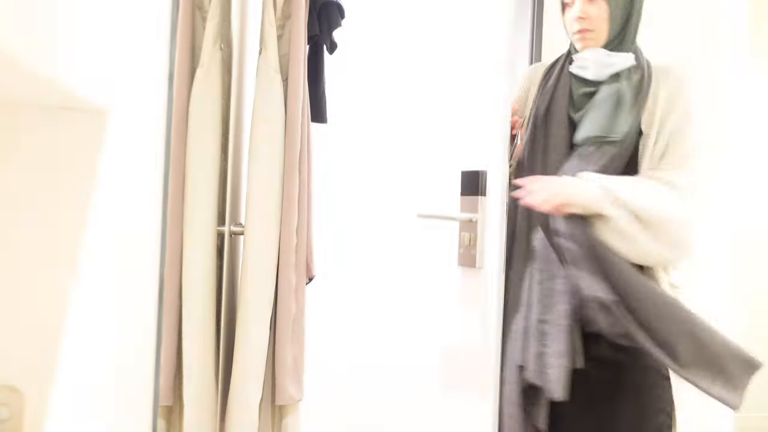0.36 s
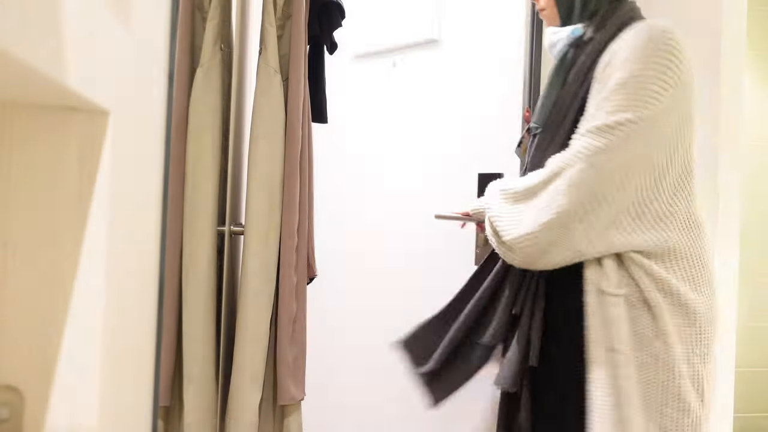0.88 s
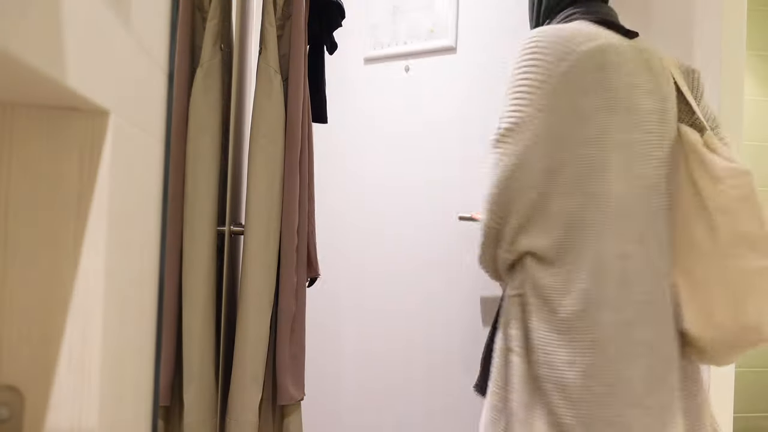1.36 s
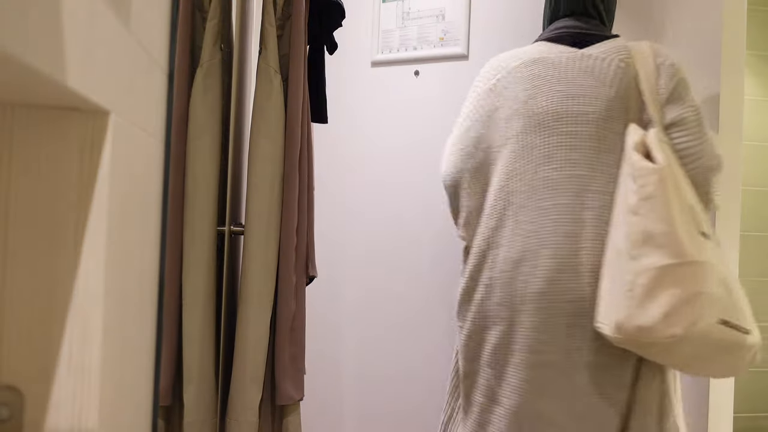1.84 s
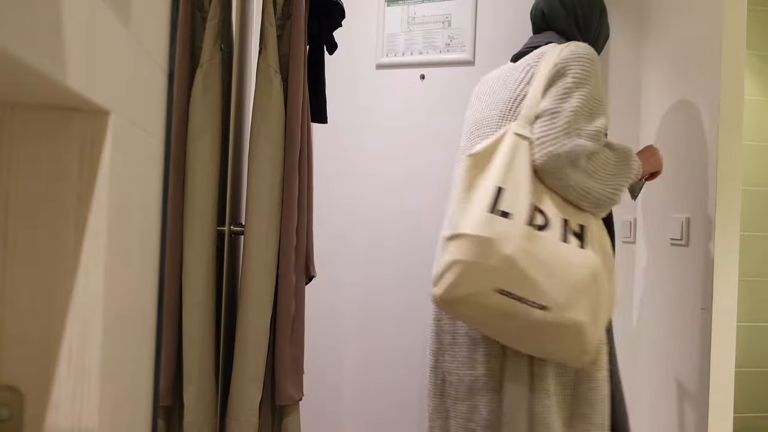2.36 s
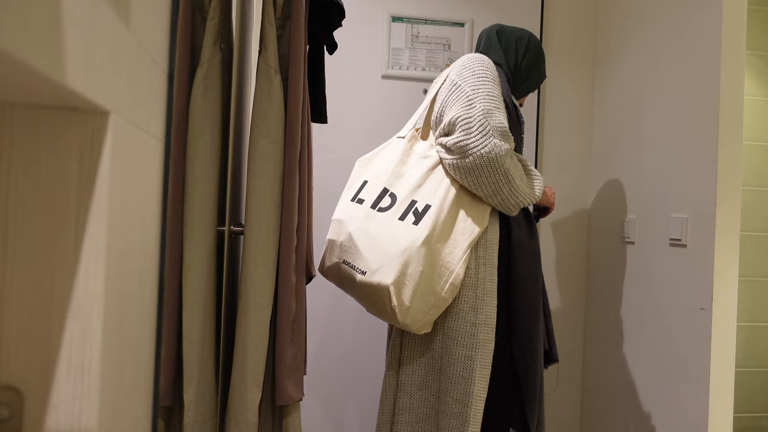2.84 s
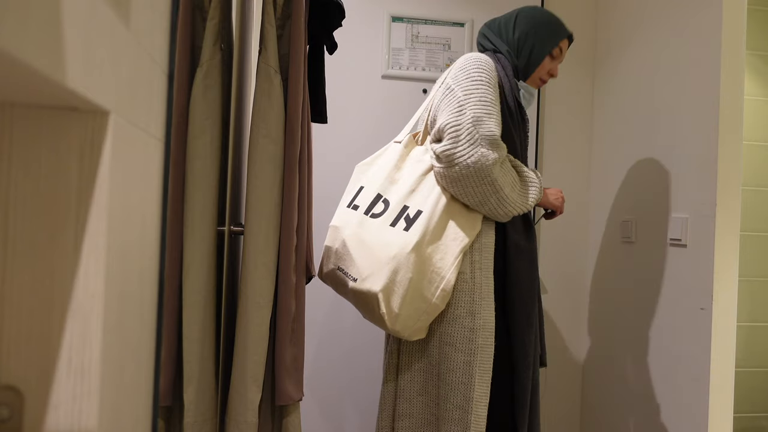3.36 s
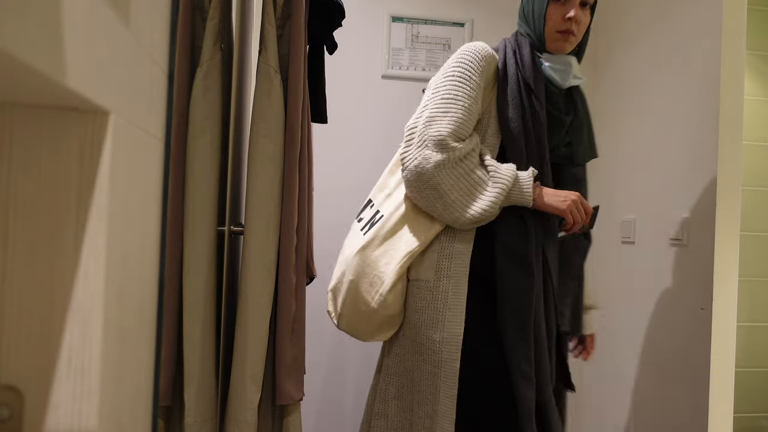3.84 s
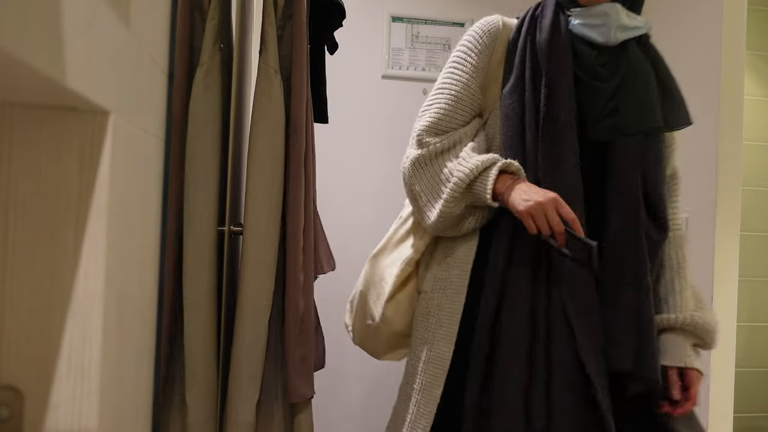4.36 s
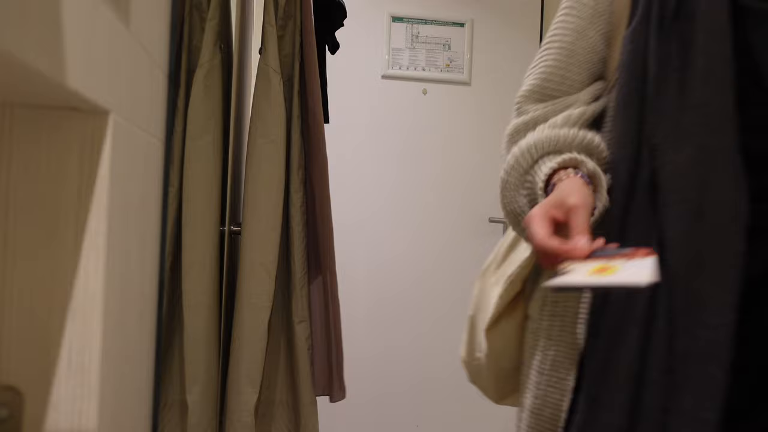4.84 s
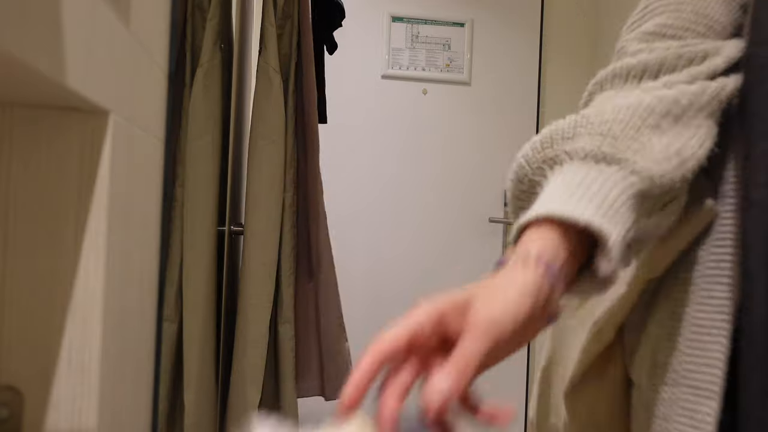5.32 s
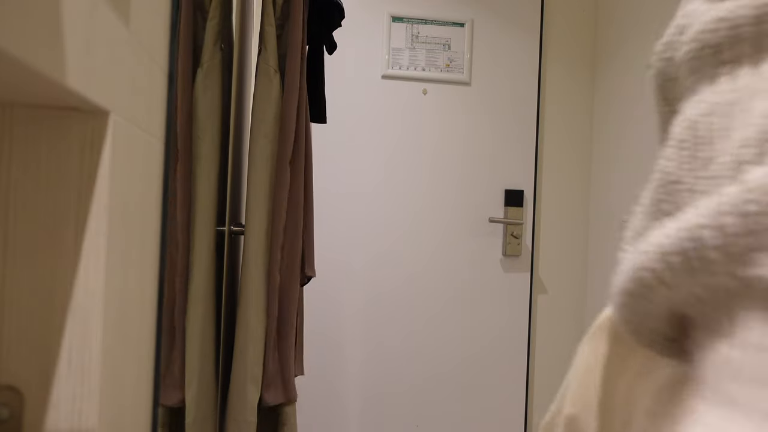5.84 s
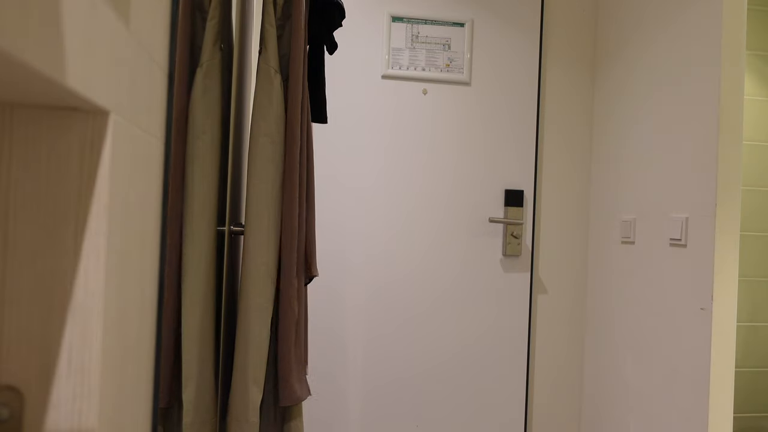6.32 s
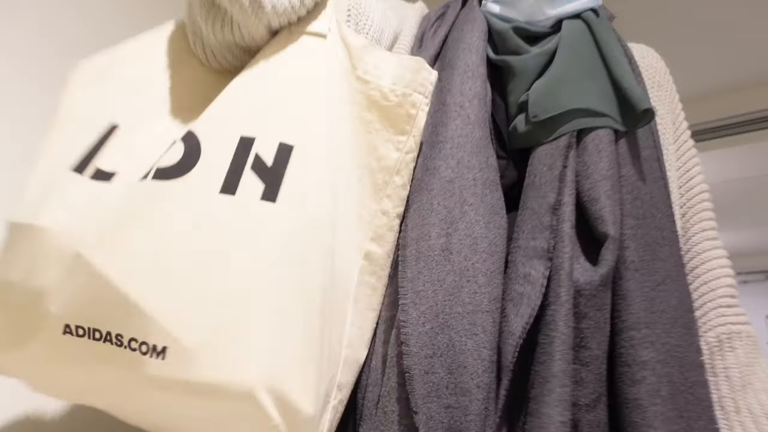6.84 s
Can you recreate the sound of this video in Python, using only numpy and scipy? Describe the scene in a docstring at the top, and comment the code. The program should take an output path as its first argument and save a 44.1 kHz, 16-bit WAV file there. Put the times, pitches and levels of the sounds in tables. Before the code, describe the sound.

A hinge squeaks, cloth rustles and bag contents tick in a small hallway; a door latches shut, then a flat object slaps onto a shelf close by.

```python
"""A hinge squeaks and a person in loose knitwear with a canvas bag moves about a small hard-walled
hallway: noise with fibre snaps for cloth, short bursts for ticks, decaying tones for thuds and pings.
At 2.6 s a latch scrapes and a door falls shut: clicks over a ringing leaf. After a quieter second the
bustle resumes; at 5.2 s something slides along a shelf, then a flat thing slaps onto it close to the
microphone. The cloth rustles on to the end, over reflections, faint rumble and hiss."""
import sys
import numpy as np
from scipy import signal
from scipy.io import wavfile

SR = 44100
rng = np.random.default_rng(int(sys.argv[2]) if len(sys.argv) > 2 else 0)


def gain_from_db(level_db):
    """Turn a decibel level (scalar or array-like) into a linear amplitude factor."""
    decades = np.asarray(level_db, float) / 20
    return 10 ** decades


def log_audio(samples):
    """Write samples as a 16-bit WAV file to the path given in sys.argv[1]."""
    # one column per channel
    frames = np.atleast_2d(samples).T
    # limit to full scale, then quantise
    limited = np.clip(frames, -1, 1)
    pcm = np.round(limited * 32767).astype(np.int16)
    wavfile.write(sys.argv[1], SR, pcm)


N = 317520


def rms_one(x):
    """Scale to rms 1."""
    return x / np.sqrt(np.mean(x ** 2) + 1e-20)


def in_time(rows):
    """Columns of a time table, one value a sample."""
    s, *columns = np.transpose(rows)
    return [np.interp(np.arange(N) / SR, s, c) for c in columns]


def at_hz(points, hz):
    """Read a table on a log-frequency axis."""
    table_hz, values = np.array(points).T
    return np.interp(np.log(hz), np.log(table_hz), values)


def drift(rate_hz):
    """Slow random curve of rms 1: twice low-passed noise, made at SR / 40."""
    r = np.exp(-80 * np.pi * rate_hz / SR)
    white = rng.standard_normal(N // 40 + 2002)
    slow = signal.lfilter([1], [1, -2 * r, r * r], white)[2000:]  # start-up dropped
    return np.interp(np.arange(N) / 40, np.arange(len(slow)), rms_one(slow))


def band(x, low_hz, high_hz):
    """Butterworth band-pass."""
    edges_hz = [low_hz, min(high_hz, .45 * SR)]
    return signal.sosfilt(signal.butter(2, edges_hz, "band", fs=SR, output="sos"), x)


def resonate(x, hz, width_hz):
    """Two-pole resonance with gain 1 on top."""
    r = np.exp(-np.pi * width_hz / SR)
    poles = [1, -2 * r * np.cos(2 * np.pi * hz / SR), r * r]
    return signal.lfilter([(1 - r * r) / 2, 0, (r * r - 1) / 2], poles, x)


def burst(contact_s, size=2500):
    """A contact: spiky noise that dies by 20 dB in the contact time."""
    t = np.arange(size) / SR
    noise = rng.standard_normal(size)
    spikes_db = 3 * rng.standard_normal(size)
    return noise * gain_from_db(spikes_db - 20 * t / contact_s) / 3


def add(out, s, piece):
    """Mix a piece in at a time."""
    i = round(s * SR)
    out[i:i + len(piece)] += piece[:N - i]


def swell(s, hold_s, db, rise_s, fade_db_per_s):
    """Power of a gesture: rise, hold, fade."""
    t = np.arange(N) / SR - s
    fade_db = fade_db_per_s * np.maximum(t - rise_s - hold_s, 0)
    return np.clip(t / rise_s, 0, 1) ** 2 * gain_from_db(db - fade_db) ** 2


# half-octave band edges: f/Hz
EDGES_HZ = 30 * 2 ** np.arange(0, 9.6, .5)
# left-right likeness of rubbing: f/Hz, likeness/1
LIKENESS = [(60, 1), (240, 0.92), (950, 0.35), (3770, 0.67), (15000, 0.87)]


def rubbing(spectrum, tilt_db_per_oct, patchy_db, grains_per_s, grain_db):
    """Friction: noise with fibre snaps, each half-octave flickering; rms 1 before the tilt."""
    together = drift(7.7)
    snap_now = rng.random(N) < grains_per_s * gain_from_db(5 * together) / SR
    snaps = snap_now * gain_from_db(3.45 * np.minimum(rng.exponential(1, N), 2.6) + grain_db)
    white = rng.standard_normal((2, 2, N)) * (1 + snaps)
    tilt_db_per_oct = np.clip(tilt_db_per_oct, -5, 5)
    flat, out = 0, 0
    for k, (low, high) in enumerate(zip(EDGES_HZ, EDGES_HZ[1:])):
        hz = np.sqrt(low * high)
        if spectrum[0][0] < hz < spectrum[-1][0]:
            mid, side = band(white[k % 2], low, high)
            alike = np.clip(at_hz(LIKENESS, hz), 0, 1)
            gain = gain_from_db(at_hz(spectrum, hz) + patchy_db * (0.46 * together + drift(20.2)))
            layer = gain * (np.sqrt(1 + alike) * mid + np.sqrt(1 - alike) * side * [[1], [-1]])
            flat = flat + layer
            # tilt pivots at 4 kHz, constant below 1.5 kHz
            out = out + layer * gain_from_db(tilt_db_per_oct * np.log2(max(hz, 1500) / 4000))
    return out / np.sqrt(np.mean(flat ** 2))


# cloth spectrum: f/Hz, density/dB
CLOTH_SPECTRUM = [(350, -8), (600, -9.5), (801, -3.5), (970, -17), (1130, -4), (1390, -2.5), (2000, -1),
                  (4400, -3), (10700, -7), (16000, -15)]
# strokes of cloth on cloth: t/s, hold/s, level/dB, brightness/(dB/octave, rubbing limits it), fade/(dB/s)
STROKES = [(0.608, 0.037, -55.5, 3.5, 200), (0.876, 0.15, -62, 19, 150), (1.22, 0.028, -48.5, 4, 200),
           (1.537, 0.052, -54, -2, 150), (1.91, 0.053, -53, -1, 250), (2.206, 0.288, -54.5, 0.5, 1500),
           (3.75, 0.018, -62, 10, 200), (3.917, .05, -54.5, 4.5, 200), (4.793, 0.028, -54.5, -2, 250),
           (4.875, 0.022, -49.5, -1, 150), (5.067, 0.043, -51.5, 2, 200), (5.324, 0.046, -57, 1, 200),
           (5.944, 0.042, -59.5, 0, 200), (6.374, 0.11, -48, -1.5, 80), (6.706, 0.092, -54.5, 3, 82),
           (7.06, 0.11, -52.5, 2, 203)]
# bustle, shared with the shuffle: t/s, shuffle level/dB, steady rustle level/dB
BUSY = [(0.0, -51.5, -57), (0.1, -58.5, -61), (0.55, -60, -61), (0.77, -51.5, -56), (1.05, -58, -54),
        (1.4, -55, -54.5), (1.8, -56, -59.5), (2.1, -61.5, -60.5), (2.52, -61.5, -63.5), (2.57, -59, -67),
        (2.62, -45.5, -58.5), (3.0, -59, -69.5), (3.3, -68, -67.5), (3.75, -69.5, -60), (4.05, -57, -56.5),
        (4.55, -55, -56.5), (4.75, -64.5, -59), (4.9, -53.5, -54), (5.4, -56, -59), (5.7, -44.5, -54),
        (6.0, -60.5, -54), (6.35, -51.5, -56.5), (6.65, -58, -49), (7.0, -58.5, -55), (7.2, -57.5, -49)]


def cloth():
    """Cloth rubs: steady rustle, strokes, and settling after each tick; power-weighted brightness."""
    rustle_db = in_time(BUSY)[1]
    parts = [(gain_from_db(rustle_db) ** 2, -1)]  # power, brightness in dB per octave
    for s, hold_s, db, bright_db, fade in STROKES:
        parts.append((swell(s, hold_s, db, 0.02, fade), bright_db))
    settling = sum(swell(s, 0, db - 20, 0.002, 149) for s, db, *_ in TICKS)
    parts.append((settling, -2))
    total = sum(power for power, _ in parts)
    tilt = sum(power * bright_db for power, bright_db in parts) / total
    rub = rubbing(CLOTH_SPECTRUM, tilt, patchy_db=2.0, grains_per_s=300, grain_db=5.5)
    return np.sqrt(total) * rub


# standing waves of the hallway: f/Hz, width/Hz, level/dB
HOLLOW = [(157.4, 26, 6), (212, 12, -1), (315, 48, 1), (456, 29, -6.5), (687, 37, 5), (1090, 65, 1.5)]


def in_hollow(x):
    """Standing waves lift low sounds; scaled to rms 1."""
    return rms_one(x + sum(gain_from_db(db) * resonate(x, hz, width_hz) for hz, width_hz, db in HOLLOW))


# shuffle spectrum: f/Hz, density/dB
SHUFFLE_SPECTRUM = [(47, -52), (80, -15.5), (312, -2), (569, -9), (693, -9), (1500, -16), (1950, -10),
                    (3300, -120)]


def shuffle():
    """Body and feet rub low in the hallway's standing waves; swells after each thud."""
    shuffle_db = in_time(BUSY)[0]
    swells = sum(swell(s, 0, db - 15.5, 0.0063, 104) for s, db, *_ in THUDS)
    rub = rubbing(SHUFFLE_SPECTRUM, 0, patchy_db=2.5, grains_per_s=170, grain_db=4.5)
    return np.sqrt(gain_from_db(shuffle_db) ** 2 + swells) * in_hollow(rub)


# ticks and snaps of things in the bag: t/s, level/dB, ring f/Hz, dull body re level/dB
TICKS = [(0.4448, -31, 2080, -20), (1.0917, -21.5, 2570, -7.5), (1.2644, -26.5, 5130, -14),
         (1.4225, -32.5, 1760, -14), (1.481, -28, 4260, -15), (1.6616, -51, 1180, 0),
         (1.837, -37, 6400, -28), (1.8986, -39, 8500, -10), (2.2084, -35.5, 2370, -29),
         (2.333, -33, 1110, -21), (3.7828, -43.5, 6440, -20), (3.927, -45, 6700, -21),
         (4.0472, -30, 2280, -21), (4.1117, -36, 5300, -13), (4.2975, -25, 1160, -37),
         (4.556, -30, 2760, -17), (4.8704, -34.5, 2930, -21), (4.9013, -33.5, 1140, -10.5),
         (4.967, -42, 9000, -25), (5.069, -29.5, 2570, -29), (5.098, -28.5, 4190, -27),
         (5.6288, -23, 1010, -18), (5.6964, -52, 3520, -15), (6.0085, -30.5, 1680, -11),
         (6.2174, -34.5, 2450, -14), (6.3964, -39, 1060, -3), (6.6571, -25, 5360, -11.5),
         (6.78, -32, 2860, -25), (7.132, -26, 4390, -39), (7.1862, -33, 1160, -15)]


def ticks():
    """Each tick is a broad crack with a short ring of its own pitch and a dull body."""
    out = np.zeros(N)
    for s, db, hz, body_db in TICKS:
        hit = burst(0.0087)
        bright = 0.71 * band(hit, 1450, 9700) + 2.53 * resonate(hit, hz, 0.28 * hz)
        body = gain_from_db(body_db + 21.5) * band(hit, 316, 1490)
        add(out, s, gain_from_db(db) * (bright + body))
    return out


def struck(rows, overtone):
    """A push rings a decaying tone and an overtone at 2.3 times its pitch."""
    out, t = np.zeros(N), np.arange(SR // 4) / SR
    for s, db, hz, t60_s in rows:
        phase = rng.uniform(0, 2 * np.pi)
        tone = np.sin(2 * np.pi * hz * t) + overtone * np.sin(2 * np.pi * 2.3 * hz * t + phase)
        onset = 1 - np.exp(-t / 0.0011)
        add(out, s, gain_from_db(db - 4.5 - 60 * t / t60_s) * onset * tone)
    return out


# dull thuds of feet and bag: t/s, level/dB, f/Hz, t60/s
THUDS = [(0.34, -39, 154, 0.049), (0.976, -35, 315, 0.035), (1.302, -39.5, 309, 0.14),
         (1.328, -42, 181.7, 0.22), (1.485, -34, 230, 0.051), (1.544, -37, 320, 0.078),
         (1.61, -34, 307, 0.086), (1.616, -32.5, 465, 0.13), (4.033, -42, 323, 0.18),
         (4.39, -41, 277, 0.044), (4.823, -40.5, 273, 0.056), (4.9, -43, 324, 0.1),
         (5.349, -39.5, 460, 0.11), (5.659, -36, 208, 0.11), (5.854, -40.5, 367, 0.083),
         (6.009, -36.5, 368, 0.053), (6.123, -36.5, 227, 0.056), (6.387, -42, 315, 0.079),
         (6.415, -39, 700, 0.091), (6.525, -43, 860, 0.063), (7.039, -47.5, 217, 0.18)]


def thuds():
    """Dull blows: low tone with a weaker overtone."""
    return struck(THUDS, 0.35)


# rings of handle and fittings: t/s, level/dB, f/Hz, t60/s
PINGS = [(1.258, -33.5, 4940, 0.073), (1.315, -57, 4840, .2), (1.615, -45.5, 1040, 0.071),
         (1.655, -37.5, 1160, 0.076), (1.662, -30, 2150, 0.018)]


def pings():
    """Handle and fittings ring as pure decaying tones."""
    return struck(PINGS, 0)


# latch sliding over the plate: t/s, level/dB
LATCH = [(2.57, -61), (2.59, -51), (2.604, -50.5), (2.662, -40)]
# door contacts: t/s, metal click level/dB, leaf blow level/dB
SLAM = [(2.6690, -5.5, -21.5), (2.6731, 0, -20.5), (2.680, -23, -15.5), (2.688, -17, -17.5),
        (2.694, -16.5, -30), (2.700, -29, -18.5), (2.72, -17.5, -28), (2.752, -32, -28.5)]
# modes of the leaf: f/Hz, level/dB, t60/s
LEAF = [(224, -8, 0.084), (326, 0.5, 0.36), (477, -5.5, 0.15), (635, 0.5, 0.11), (683, 1.5, 0.11),
        (1000, -6, 0.095), (1160, 0.5, 0.056), (1250, -13, 0.12)]


def door():
    """The latch scrapes, snaps in with bright clicks, and the leaf rings at every blow."""
    t = np.arange(N) / SR
    friction = band(band(rng.standard_normal(N), 400, 2350), 300, 3700)
    scrape = rms_one(friction) * gain_from_db(drift(64))  # flickers by 1 dB rms
    out = scrape * gain_from_db(in_time(LATCH)[0]) * (t > LATCH[0][0]) * (t < LATCH[-1][0])
    t = t[:SR // 2]
    for s, click_db, blow_db in SLAM:
        add(out, s, gain_from_db(click_db) * band(burst(0.0071), 1900, 8300))
        add(out, s, gain_from_db(blow_db + 15.5) * band(burst(0.017), 280, 1690))
        for hz, db, t60_s in LEAF:
            ring_db = blow_db + db - 13.5 + rng.normal(0, 1.7) - 60 * t / t60_s
            add(out, s, gain_from_db(ring_db) * np.sin(2 * np.pi * hz * t) * rng.choice([-1, 1]))
    return band(out, 120, 19000)


# slap contacts, edge first, then flat, then a bounce: t/s, level/dB, contact/s
SLAP = [(5.4336, -10, 0.0034), (5.437, -4.5, 0.012), (5.445, -9.5, 0.0061), (5.4523, -5.5, 0.0053),
        (5.460, -9.5, 0.0092)]
# shelf resonances: f/Hz, width/Hz, level/dB
SHELF = [(307, 140, 4.5), (700, 120, 4.5), (2240, 540, 7), (2690, 740, 12.5), (4300, 250, -11),
         (7900, 720, -26), (10700, 4340, -8.5)]


def slap():
    """Short contacts coloured by the shelf's resonances over a broad crack."""
    hits = np.full(SR // 4, 1e-18)
    start_s = SLAP[0][0]
    for s, db, contact_s in SLAP:
        add(hits, s - start_s, gain_from_db(db) * burst(contact_s))
    rings = 0
    for k, (hz, width_hz, db) in enumerate(SHELF):
        rings = rings + (-1) ** k * gain_from_db(db) * resonate(hits, hz, width_hz)
    out = np.zeros(N)
    add(out, start_s, rings + 1.35 * band(hits, 1280, 9900))
    return out


# something slides along the shelf: t/s, f/Hz, level/dB
SLIDE = [(5.22, 898, -72), (5.244, 878, -58), (5.316, 895, -59), (5.422, 820, -55), (5.43, 820, -74)]


def slide():
    """Friction noise shifted onto a narrow gliding resonance."""
    hz, db = in_time(SLIDE)
    t = np.arange(N) / SR
    on = (t > SLIDE[0][0]) * (t < SLIDE[-1][0])
    return gain_from_db(db) * on * np.sqrt(2) * drift(54) * np.sin(2 * np.pi * np.cumsum(hz) / SR)


# hinge squeaks, one list each: t/s, f/Hz, level/dB
SQUEAKS = [
    [(0.1, 547, -67), (0.134, 619, -42), (0.165, 620, -71)],
    [(0.19, 680, -60), (0.224, 575, -49), (0.24, 586, -95)],
]


def hinge():
    """Stick-slip as a sine of gliding pitch."""
    out = np.zeros(N)
    for rows in SQUEAKS:
        hz, db = in_time(rows)
        start_s, end_s = rows[0][0], rows[-1][0]
        on = np.interp(np.arange(N) / SR, [start_s, start_s + .01, end_s - .01, end_s], [0, 1, 1, 0])
        out += np.sqrt(2) * on * gain_from_db(db) * np.sin(2 * np.pi * np.cumsum(hz) / SR)
    return out


# decay of the hallway: f/Hz, t60/s
ROOM_T60 = [(100, 0.86), (300, 0.51), (1000, 0.42), (4000, 0.54), (8000, 0.36), (14000, 0.42)]
# side re mid of the reflections: f/Hz, level/dB
SIDEWAYS = [(400, -21.5), (1300, -8), (4400, -7.5), (9000, -9), (15000, -12)]


def hallway(x):
    """Dense reflections: noise that dies band by band, mostly alike in both ears."""
    t, tail = np.arange(SR) / SR, 0
    for low, high in zip(EDGES_HZ, EDGES_HZ[1:]):
        hz = np.sqrt(low * high)
        white = rng.standard_normal((2, SR)) * [[1], [gain_from_db(at_hz(SIDEWAYS, hz))]]
        tail = tail + band(white, low, high) * gain_from_db(-60 * t / at_hz(ROOM_T60, hz))
    mid, side = tail * np.clip((t - .003) / 0.0041, 0, 1)  # walls answer after 3 ms and fill in
    tail = np.array([mid + side, mid - side]) / np.sqrt(np.sum(mid ** 2))
    return signal.fftconvolve(x[None], tail, axes=1)[:, :N]


def still_room():
    """Low steady rumble of distant ventilation and faint wide microphone hiss."""
    rumble_db, hiss_db = -75, -71.5
    mid, left, right = rng.standard_normal((3, N))
    sides = np.array([left, right])
    rumble = in_hollow(band(mid + 0.9 * sides, 68, 230))
    hiss = rms_one(band(mid + 3.6 * sides, 710, 11300))
    return gain_from_db(rumble_db) * rumble + gain_from_db(hiss_db) * hiss


# where the person is: t/s, left minus right level/dB
LEAN = [(0, 0), (5.2, 0.5), (6.1, 0), (7.2, 1.5)]


def scene():
    """Rustle, hits and their reflections."""
    rubs = shuffle() + cloth()
    small = ticks() + thuds() + pings()
    squeak, far, near = hinge() + slide(), door(), slap()
    wet = hallway(gain_from_db(-4.0) * small + gain_from_db(-14) * squeak + gain_from_db(-1.5) * far + gain_from_db(-3.5) * near)
    person = (rubs + small) * gain_from_db(in_time(LEAN)[0] * [[.5], [-.5]])
    far_stereo = far * gain_from_db([[.3], [-.3]])
    near_stereo = near * gain_from_db([[1.5], [-1.5]])
    return still_room() + person + squeak + far_stereo + near_stereo + wet


def top_cut(x):
    """Nothing passes above the cut-off."""
    return signal.sosfilt(signal.butter(12, 16850, fs=SR, output="sos"), x)


def record(dry):
    """The microphone loses the deep bass and rounds the sharpest peaks."""
    thin = signal.sosfilt(signal.butter(2, 30, "high", fs=SR, output="sos"), dry)
    rounded = .5 * np.tanh(thin / .5)
    return top_cut(rounded)


dry = scene()
out = record(dry)
log_audio(out)
```